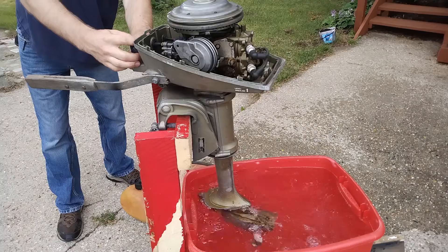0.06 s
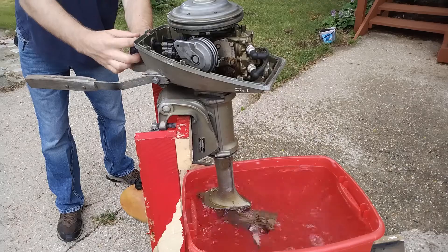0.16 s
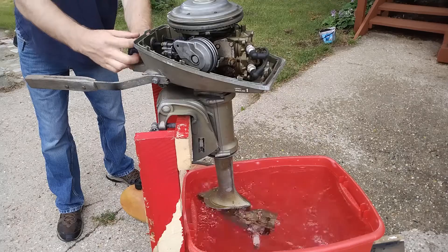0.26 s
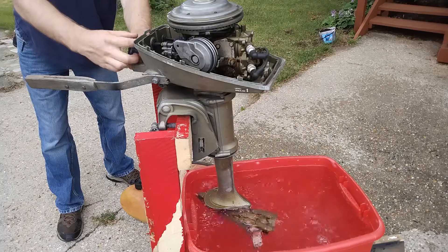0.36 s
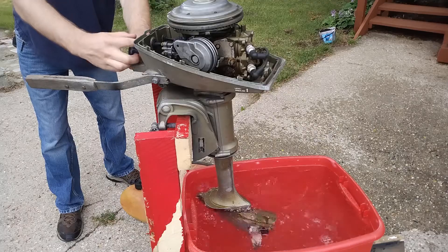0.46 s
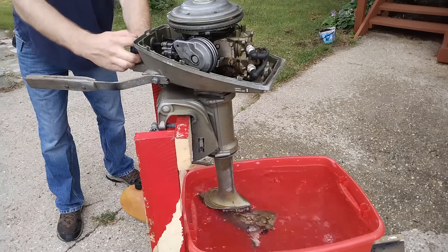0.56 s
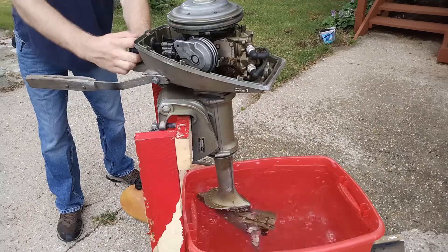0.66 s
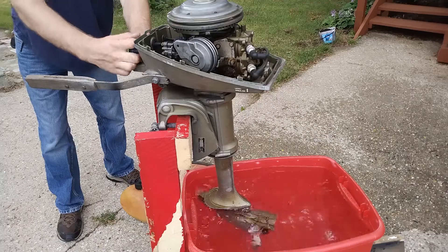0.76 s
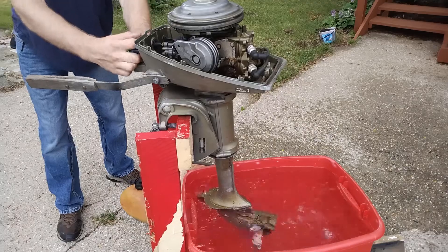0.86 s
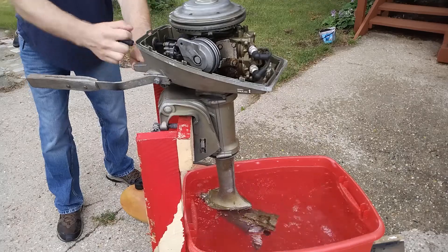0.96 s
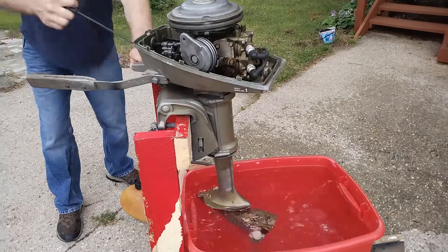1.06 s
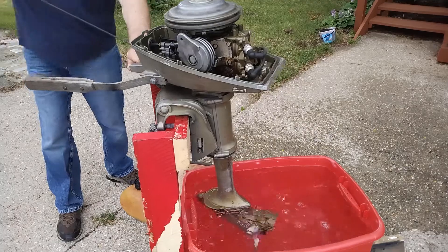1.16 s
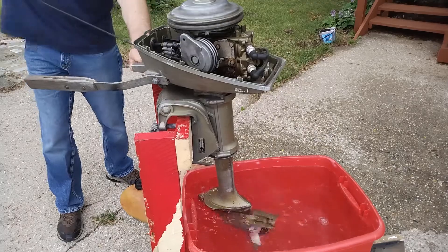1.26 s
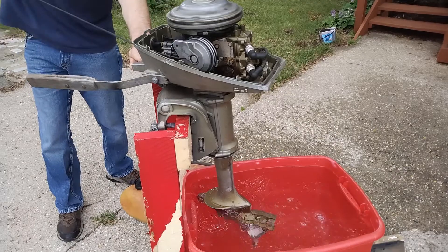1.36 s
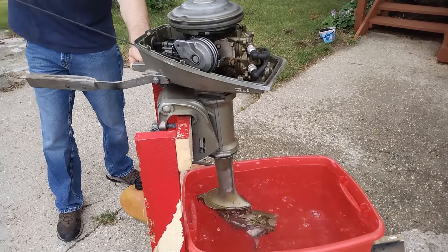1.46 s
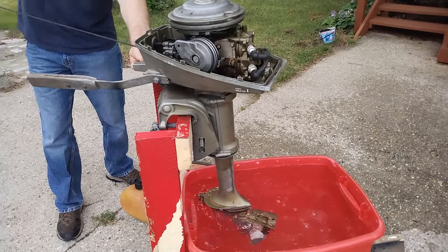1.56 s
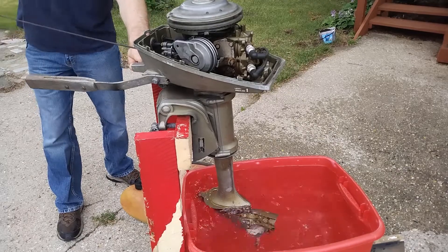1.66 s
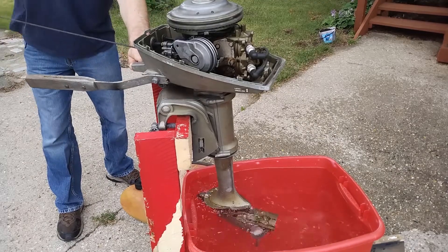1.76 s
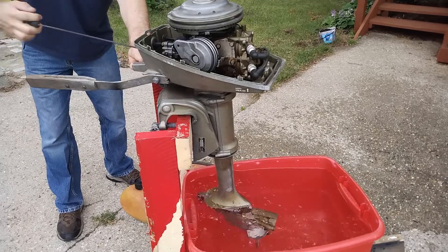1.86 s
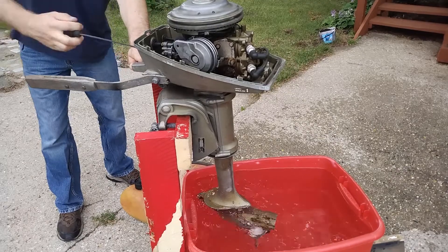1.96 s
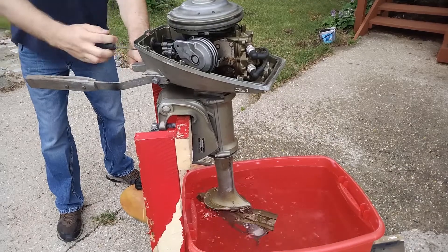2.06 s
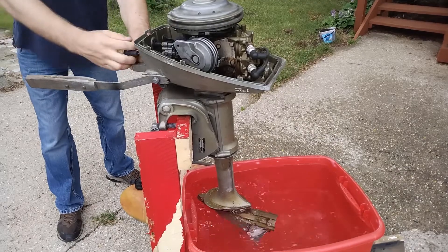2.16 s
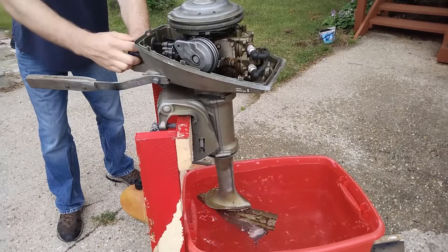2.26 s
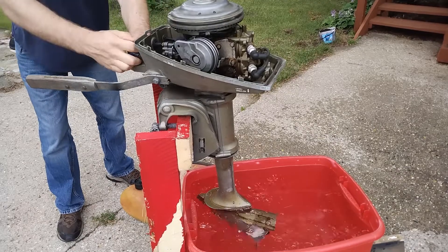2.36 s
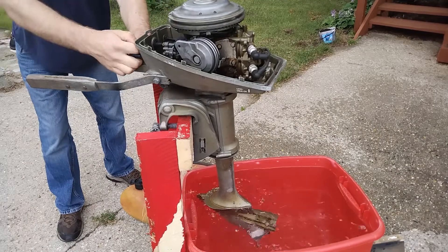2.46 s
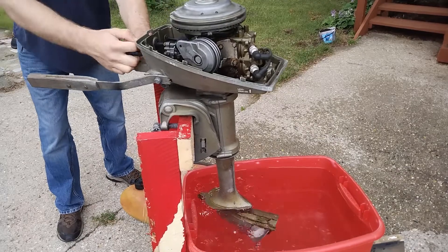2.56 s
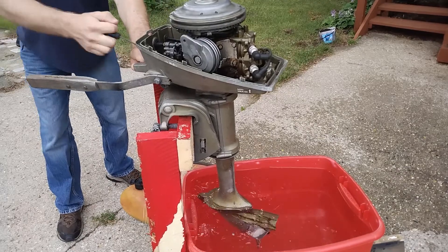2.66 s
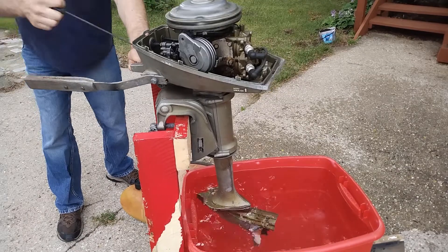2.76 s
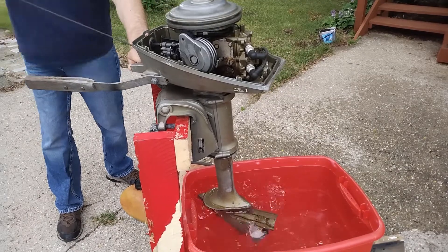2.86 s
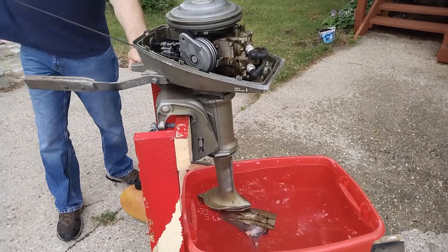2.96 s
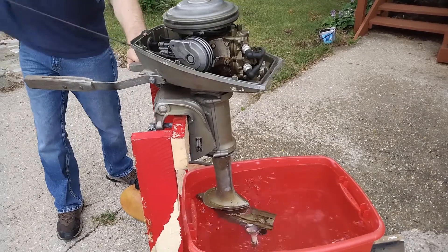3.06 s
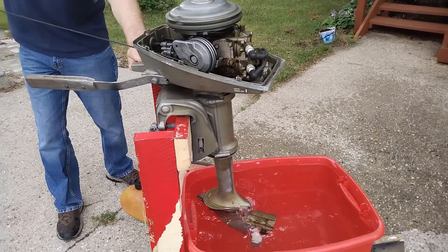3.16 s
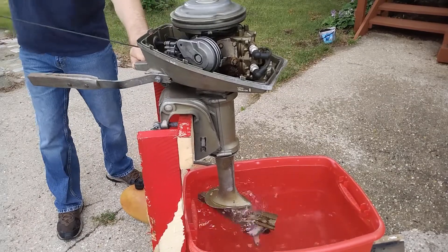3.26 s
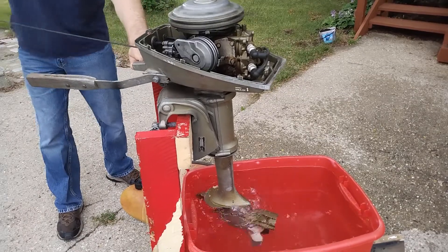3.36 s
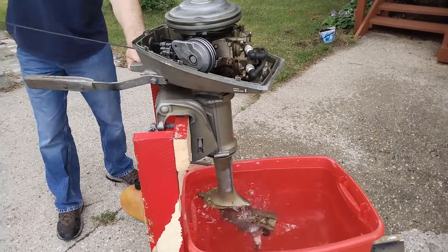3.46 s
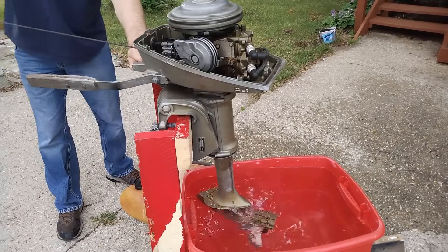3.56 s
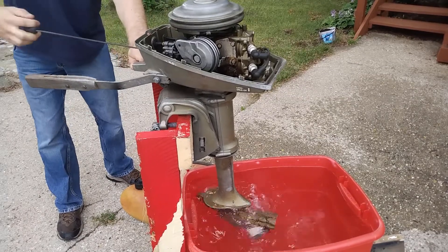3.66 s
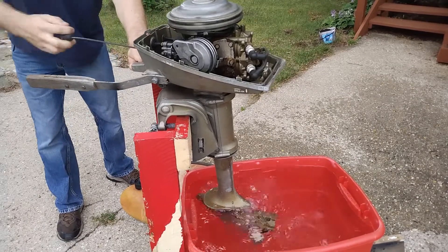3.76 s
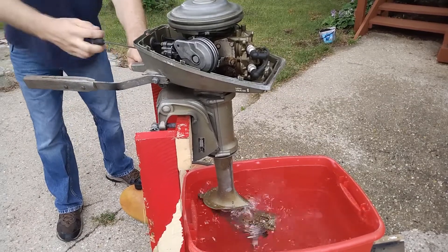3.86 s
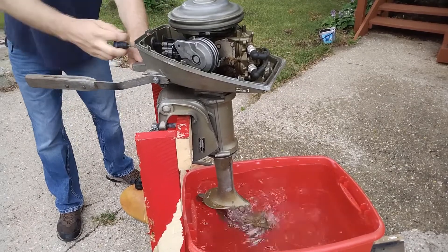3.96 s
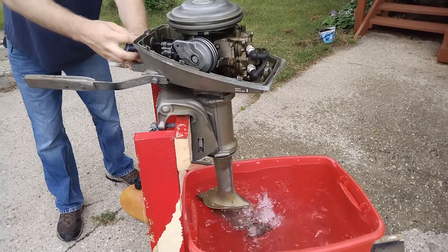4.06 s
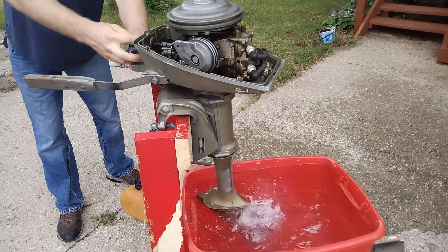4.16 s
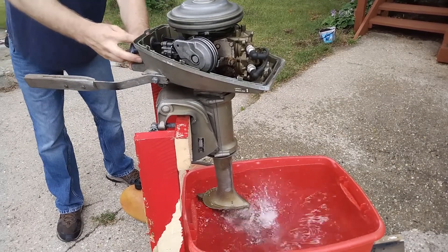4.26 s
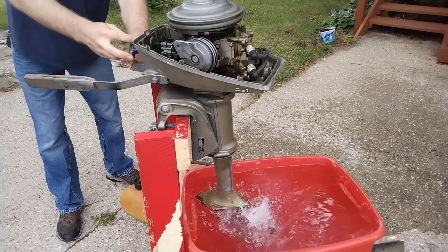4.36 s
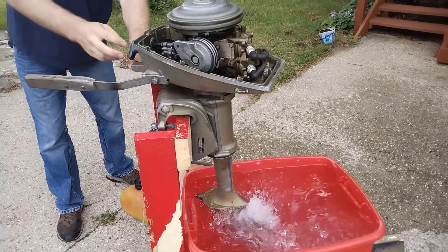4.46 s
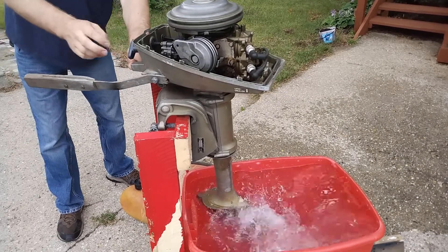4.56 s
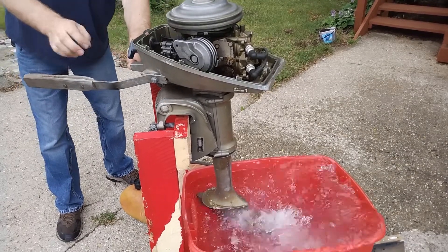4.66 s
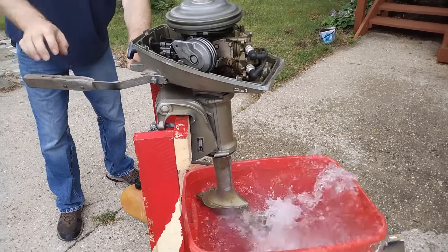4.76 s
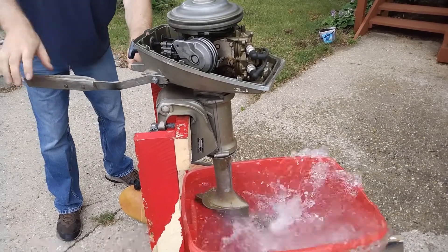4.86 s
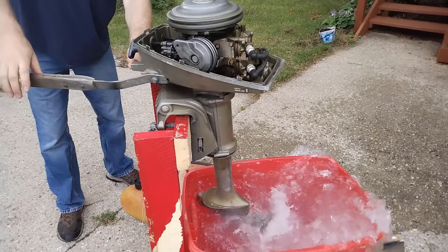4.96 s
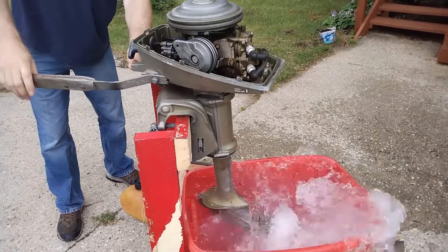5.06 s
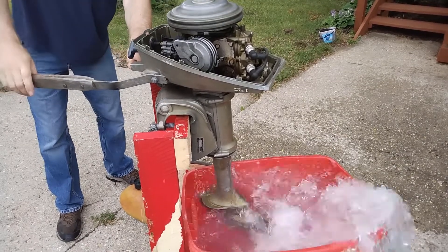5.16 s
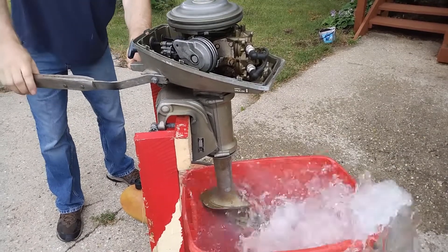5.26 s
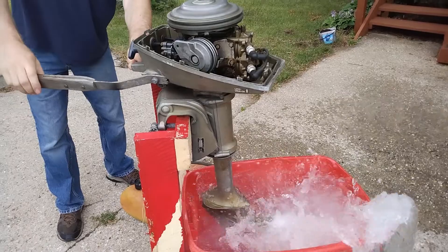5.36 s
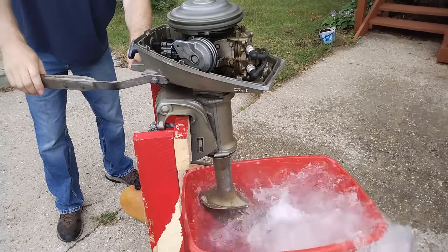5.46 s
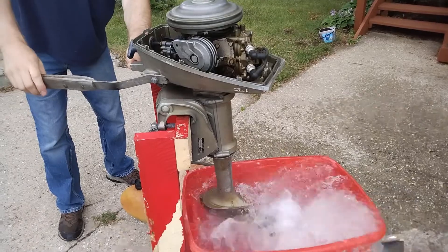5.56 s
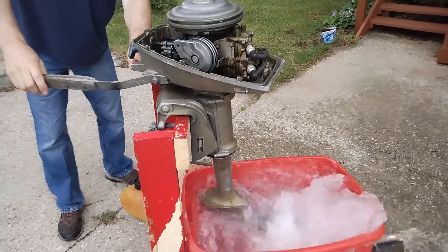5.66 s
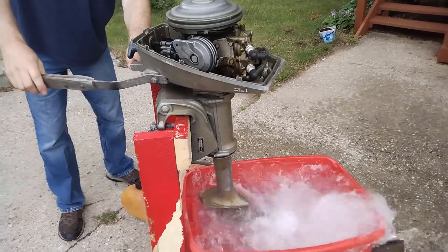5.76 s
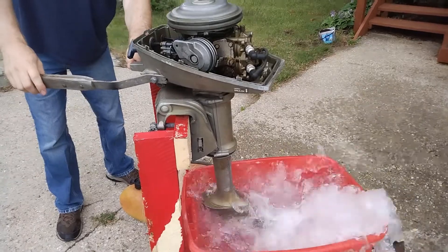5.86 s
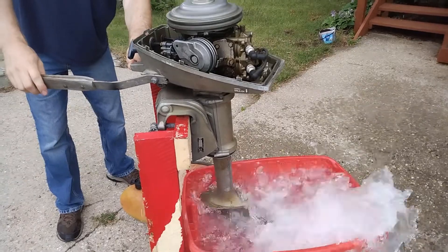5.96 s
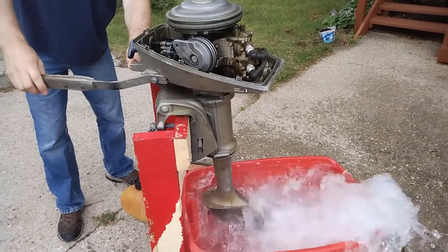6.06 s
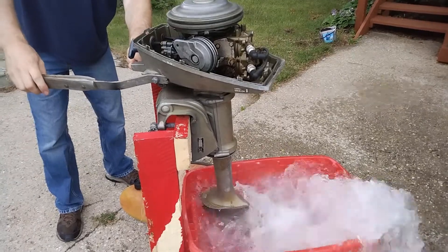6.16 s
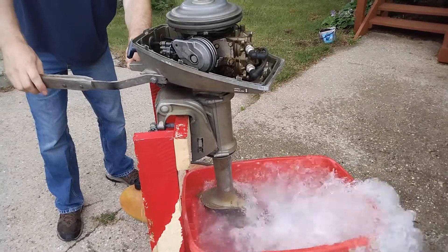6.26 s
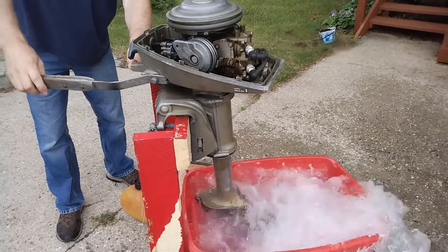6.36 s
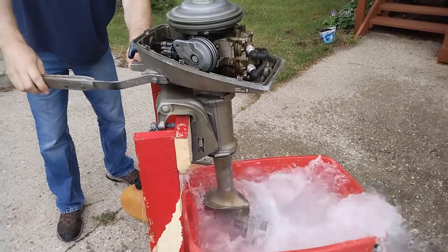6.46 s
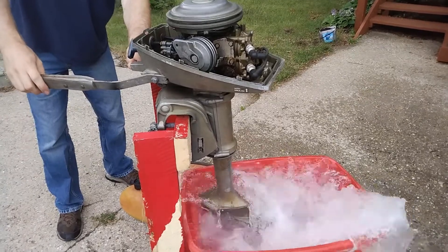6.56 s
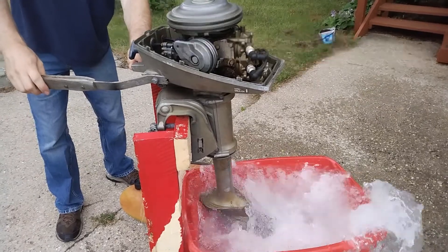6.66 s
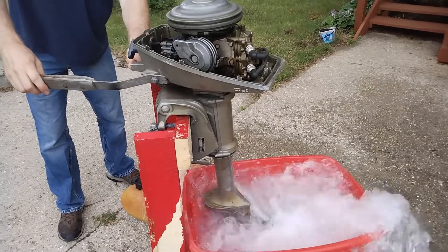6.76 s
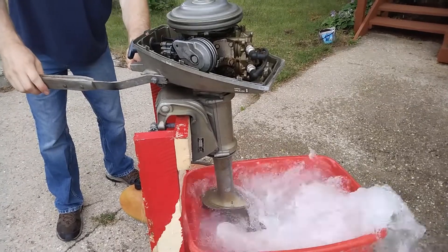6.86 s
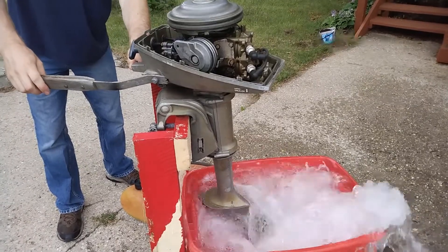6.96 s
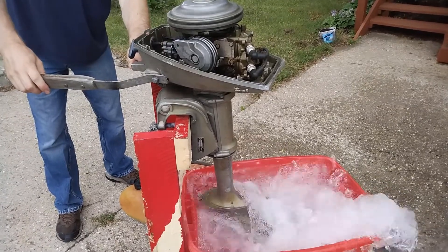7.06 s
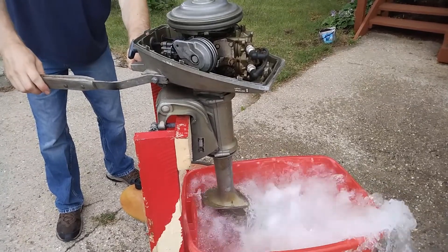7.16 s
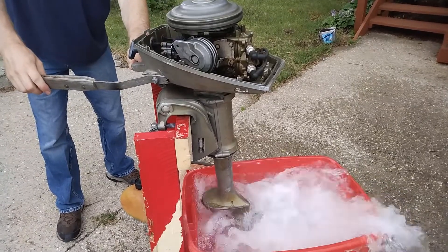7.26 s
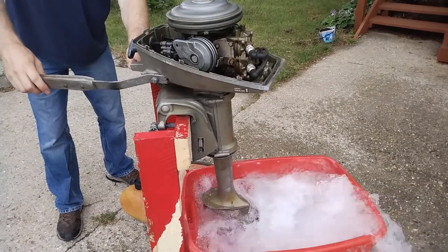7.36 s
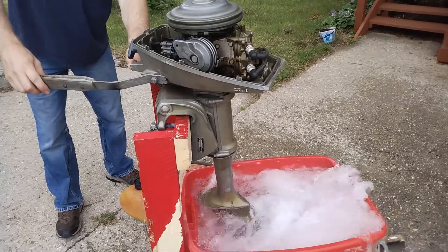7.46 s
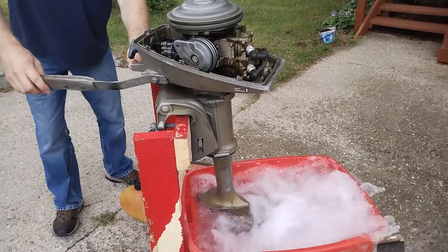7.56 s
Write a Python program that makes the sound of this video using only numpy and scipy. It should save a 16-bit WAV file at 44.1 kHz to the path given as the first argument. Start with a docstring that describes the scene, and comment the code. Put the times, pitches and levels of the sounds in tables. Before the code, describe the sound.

Outdoors, a starter cord rips twice with clattering gear teeth; the small boat motor sputters, fires up and climbs to a throbbing, splashing drone

```python
"""Starting a small outboard engine

A small two-stroke outboard is clamped over a tub of water outdoors, with faint birds and a breeze.
The starter rope is pulled twice: gear teeth rattle as random clicks ringing in the housing.
After the second pull the engine chugs, catches and revs up. Each firing rings decaying sine waves for
the exhaust; filtered noise and clicks throb with it as roar and spray, and large drops slap the tub."""
import sys
import numpy as np
from scipy import signal
from scipy.fft import rfft, irfft, next_fast_len
from scipy.io import wavfile

SR = 44100
rng = np.random.default_rng(int(sys.argv[2]) if len(sys.argv) > 2 else 0)


def to_wav(sig):
    """Store sig (one row per channel, or 1-D mono) as 16-bit WAV at the path in sys.argv[1].

    Samples outside -1..1 are clipped; the rate is SR.
    """
    pcm = np.clip(np.atleast_2d(sig), -1, 1) * 32767
    pcm = np.round(pcm).astype(np.int16)
    wavfile.write(sys.argv[1], SR, pcm.T)  # frames by channels


N = 336042


def amp(db):
    """Turn a level in dB into a gain."""
    return 10 ** (np.asarray(db) / 20)


def rms_one(x):
    """Scale to an average strength (rms) of 1."""
    return x / np.sqrt(np.mean(x ** 2) + 1e-20)


def noise():
    """White noise for the whole scene."""
    return rng.standard_normal(N)


def high_pass(x, hz):
    """Remove what lies below hz."""
    return signal.sosfilt(signal.butter(2, hz, "high", fs=SR, output="sos"), x)


def low_pass(x, hz):
    """Soften what lies above hz."""
    return signal.sosfilt(signal.butter(2, hz, fs=SR, output="sos"), x)


def in_time(rows, outside=None):
    """Join the points of a time table by straight lines, one curve per column."""
    s, *columns = np.transpose(rows)
    return [np.interp(np.arange(N) / SR, s, c, outside, outside) for c in columns]


def at_hz(points, hz):
    """Read a spectrum table on a log pitch axis."""
    table_hz, level_db = np.array(points).T
    return np.interp(np.log(hz + 1), np.log(table_hz), level_db)


def drift(rate):
    """Slow random wander of rms 1; a higher rate wanders faster."""
    r = np.exp(-80 * np.pi * rate / SR)
    # computed at every 40th sample, after a run-in of 2000 steps
    steps = rng.standard_normal(N // 40 + 2002)
    slow = signal.lfilter([1], [1, -2 * r, r * r], steps)[2000:]
    return np.interp(np.arange(N) / 40, np.arange(len(slow)), rms_one(slow))


def filter_by(x, spectrum):
    """Apply a spectrum table as a filter."""
    return irfft(rfft(x) * amp(at_hz(spectrum, np.fft.rfftfreq(N, 1 / SR))), N)


def colour(x, spectrum):
    """Give noise the tone of a spectrum table, at rms 1."""
    return rms_one(filter_by(x, spectrum))


def resonate(x, hz, width):
    """Ring one resonance of a width in Hz, with gain 1 at its peak."""
    r = np.exp(-np.pi * width / SR)
    top = np.array([1, 0, -1]) * (1 - r * r) / 2
    return signal.lfilter(top, [1, -2 * r * np.cos(2 * np.pi * hz / SR), r * r], x + 1e-18)


def grains(per_s, spread_db):
    """Random clicks of uneven size and sign."""
    sizes = amp(spread_db * np.minimum(rng.exponential(1, N), 4)) * rng.choice([-1, 1], N)
    return sizes * (rng.random(N) < per_s / SR)


def puffs(events, t60_s, rise_s=0.000055):
    """Short noise bursts from rows of time and level; each rises, then dies away."""
    clicks = np.full(N, 1e-18)
    start_s, level_db = np.array(events).T
    clicks[(start_s * SR).astype(int)] = amp(level_db)
    dying = signal.lfilter([1], [1, -amp(-60 / (t60_s * SR))], clicks)
    r = np.exp(-1 / (rise_s * SR))
    return signal.lfilter([1 - r], [1, -r], dying) * noise()


def swell(full_s, end_s, db, rise, fall, sag=0.0, hold_s=0.0):
    """Level in dB: rises to full, sags after a hold, falls faster after the end (rates in dB per s)."""
    t = np.arange(N) / SR
    rising = rise * np.maximum(full_s - t, 0)
    sagging = sag * np.maximum(t - full_s - hold_s, 0)
    return db - rising - sagging - fall * np.maximum(t - end_s, 0)


# steady background tone: pitch_hz, level_db (relative)
YARD_SPECTRUM = [(88, -16), (1820, -17.5), (2960, -27), (13800, -36.5), (15800, -35)]
YARD_DB = -75


def yard():
    """The quiet outdoor background is steady coloured noise."""
    return amp(YARD_DB) * colour(noise(), YARD_SPECTRUM)


# stronger gusts: peak_s, level_db (before panning)
GUST_TABLE = [(0.28, -51.5), (0.62, -53.5)]
BREEZE_DB, GUST_DB_PER_S = -60.5, 148   # level of the rumble before panning; rise and fall of a gust


def breeze():
    """Wind makes a lumpy low rumble; the stronger it blows, the more it leans to the left."""
    gusts = [swell(s, s, db, GUST_DB_PER_S, GUST_DB_PER_S) for s, db in GUST_TABLE]
    level_db = np.max([np.full(N, BREEZE_DB)] + gusts, axis=0)
    lumps = rng.standard_normal((3, N)) * amp(2.0 * drift(23))
    lumps = signal.sosfilt(signal.butter(2, [60, 130], "band", fs=SR, output="sos"), lumps)
    pan_db = 0.63 * np.maximum(level_db + 63.0, 0) * [[1], [-1]]
    # one shared rumble, plus a little of each side's own
    return amp(level_db + pan_db) * rms_one(lumps[0] + .1 * lumps[1:])


# distant chirps, around which pitch and level warble: start_s, length_s, first_hz, last_hz, level_db
CHIRPS = [(0.134, 0.088, 3600, 3840, -74), (0.249, 0.1, 3720, 3500, -76), (0.518, 0.098, 3880, 3400, -73),
          (0.544, 0.058, 3600, 5030, -68), (0.687, .06, 3700, 3440, -78), (0.745, 0.071, 4350, 3800, -74),
          (2.218, 0.04, 4250, 4750, -69), (2.297, 0.05, 4120, 4700, -71.5)]


def birds():
    """Chirps are warbling near-sine tones, blurred by distance and by echoes off the houses."""
    out = np.zeros(N)
    for s, length, first, last, db in CHIRPS:
        i, t = int(s * SR), np.arange(int(length * SR)) / SR
        span = slice(i, i + len(t))
        hz = first + (last - first) * t / length + 110 * drift(63)[span]
        tone = np.sin(2 * np.pi * np.cumsum(hz) / SR)
        out[span] += amp(db + 6.8 * drift(120)[span]) * np.sin(np.pi * t / length) * tone
    lags_s = rng.uniform(.015, .15, size=12)
    out = out + sum(amp(-10 - 60 * lag) * np.roll(out, int(lag * SR)) for lag in lags_s)
    # farther calls blur together
    return out + amp(-82.5 + 4 * drift(8)) * rms_one(resonate(noise(), 4100, 990))


# resonances of the starter housing: pitch_hz, width_hz, level_db (relative)
HOUSING_MODES = [(1127, 770, 3), (1400, 2400, 1.5), (1780, 360, 8), (2910, 1320, -2), (3230, 210, 10.5),
                 (4740, 92, -2), (5130, 340, -2)]


def housing(x, tilt_db=0.0):
    """The starter housing rings broadly; which resonance is struck, and which side of it, keeps shifting."""
    out = 0
    for k, (hz, width, db) in enumerate(HOUSING_MODES):
        for side in (-1, 1):
            struck = x * amp(db - 11 + tilt_db * np.log2(hz / 2000) + 3.0 * drift(30))
            out = out + (-1) ** k * resonate(struck, hz * (1 + .025 * side), .6 * width)
    return out


# pawl and handle knocks: start_s, level_db (relative), brightness_db (snap against the knock)
KNOCK_TABLE = [(0.9845, -51, -21), (1.1034, -17, 2), (1.4534, -12, -5), (1.661, -23, -7.5),
               (1.699, -33, -10), (1.744, -22, -12), (1.948, -28, -22), (2.092, -22.5, -34),
               (2.7739, -33, -9), (2.7805, -16, 6.5), (3.1285, -12.5, -5.5)]
# the first tug jolts the stand: start_s, level_db (relative)
STAND_JOLT = [(1.1, -24)]


def knocks():
    """A knock cracks into the housing with a bright snap; the jolted stand thuds low."""
    snap = puffs([(s, db + bright) for s, db, bright in KNOCK_TABLE], t60_s=.03, rise_s=.001)
    crack = puffs([row[:2] for row in KNOCK_TABLE], t60_s=0.018, rise_s=0.0002)
    thud = amp(24.5) * resonate(puffs(STAND_JOLT, t60_s=0.043), 83, 80)
    return amp(12) * housing(crack) + high_pass(snap, 5000) + thud


# rope pulls: grab_s (pawl grabs), full_s (full speed), end_s (rope ends), level_db, slowing_db_per_s
ROPE_PULLS = [(1.1, 1.231, 1.428, -20.5, 79.5), (2.785, 2.906, 3.105, -22, 34)]
PULL_RISE_DB_PER_S, PULL_HOLD_S, PULL_STOP_DB_PER_S = 306.5, 0.084, 598
GRAB_DB, GRAB_FALL_DB_PER_S = -31.5, 545.5
CLACK_AFTER_S, CLACK_RATTLE_DB, CLACK_FALL_DB_PER_S = 0.023, -25.5, 457   # pawl lets go after rope end
# rope running back: full_s (under way), end_s (home), level_db, slowing_db_per_s
ROPE_REWINDS = [(1.593, 2.191, -46, 7.5), (3.246, 4.192, -45.5, 5)]
REWIND_RISE_DB_PER_S, REWIND_STOP_DB_PER_S = 202, 238
# wheezes of air while the flywheel coasts: peak_s, level_db (of the hiss)
AIR_WHEEZES = [(1.721, -35), (1.905, -41.5), (3.434, -39.5), (3.84, -44.5)]
WHEEZE_RISE_DB_PER_S, WHEEZE_FALL_DB_PER_S, WHEEZE_RATTLE_DB = 310, 473, -3
# tone of rope and air: pitch_hz, level_db (relative)
HISS_SPECTRUM = [(2350, -4.5), (4400, -1.5), (15800, -14.5)]
PULL_HISS_DB, REWIND_HISS_DB = -1, -8   # hiss relative to the rattle
RATCHET_PER_S, RATCHET_DB = 260, 2.0    # loose clicks while the rope runs back
COLOUR_CLIMB_DB_PER_S = 28.5            # per octave: a pull starts dull and brightens as the gear spins up


def starter():
    """Gear teeth rattle in the housing; rope and pumped air hiss."""
    t = np.arange(N) / SR
    pulls = [swell(full, end, db, PULL_RISE_DB_PER_S, PULL_STOP_DB_PER_S, sag, PULL_HOLD_S)
             for _, full, end, db, sag in ROPE_PULLS]
    grabs = [swell(grab, grab, GRAB_DB, 5000, GRAB_FALL_DB_PER_S) for grab, *_ in ROPE_PULLS]
    clack_s = [end + CLACK_AFTER_S for _, _, end, *_ in ROPE_PULLS]
    clacks = [swell(s, s, CLACK_RATTLE_DB, 3700, CLACK_FALL_DB_PER_S) for s in clack_s]
    rewinds = [swell(s, end, db, REWIND_RISE_DB_PER_S, REWIND_STOP_DB_PER_S, sag)
               for s, end, db, sag in ROPE_REWINDS]
    wheezes = [swell(s, s, db, WHEEZE_RISE_DB_PER_S, WHEEZE_FALL_DB_PER_S) for s, db in AIR_WHEEZES]

    pull = amp(pulls + grabs + clacks).sum(axis=0) * (t > ROPE_PULLS[0][0] - .01)
    rewind, wheeze = amp(rewinds).sum(axis=0), amp(wheezes).sum(axis=0)
    gear = pull + rewind + amp(WHEEZE_RATTLE_DB) * wheeze
    air = amp(PULL_HISS_DB) * pull + amp(REWIND_HISS_DB) * rewind + wheeze

    teeth = rms_one(grains(1300 * amp(3.5 * drift(40)), spread_db=3.5)) + .6 * noise()
    hiss = high_pass(colour(noise() * amp(3.8 * drift(53)) + 4.0 * teeth, HISS_SPECTRUM), 3800)
    loose = low_pass(grains(RATCHET_PER_S, spread_db=2.6), 4500)
    ratchet = amp(RATCHET_DB) * rewind * rms_one(housing(loose))
    climb = sum(COLOUR_CLIMB_DB_PER_S * (t - full - .08) * (t > grab) * (t < end)
                for grab, full, end, *_ in ROPE_PULLS)
    rattle = gear * rms_one(housing(teeth, climb))
    # the block's growl weakens a little less than the rattle does
    growl = amp(-12.0) * gear ** 0.94 * rms_one(resonate(teeth, 530, 360))
    # hard-driven teeth fill in between the rings
    rasp = amp(-1.5) * pull * rms_one(resonate(teeth, 2200, 3000))
    return rasp + growl + rattle + ratchet + air * rms_one(hiss)


# ring of the released pawl: pitch_hz, level_db
PAWL_MODES = [(5200, -18.5), (7050, -25.5), (8790, -23.5), (11580, -43)]
PAWL_T60_S = 0.044   # time to die by 60 dB


def pawl():
    """The released pawl rings thinly, as a few dying sine tones."""
    out, t = np.zeros(N), np.arange(SR // 5) / SR
    ring = sum(amp(db - 60 * t / PAWL_T60_S) * np.sin(2 * np.pi * hz * t) for hz, db in PAWL_MODES)
    for _, _, end, *_ in ROPE_PULLS:
        i = int((end + CLACK_AFTER_S) * SR)
        out[i:i + len(t)] += ring
    return out


# slow strokes before the engine catches: start_s, level_db (relative), bark_db (against that level)
CHUG_TABLE = [(1.512, -15.5, -25), (1.581, -14.5, -31), (3.176, -11.5, -37), (3.247, -9.5, -7.5),
              (3.293, -7, -29), (3.365, -6.5, -15), (3.413, -4, -16), (3.537, -4.5, -33), (3.619, -6, -12),
              (3.662, -6, -18), (3.718, -9, -8), (3.768, -2.5, -12), (3.817, -8.5, -2.5), (3.852, -5, -29),
              (3.9, -11, -1.5), (3.934, -4, -20), (3.975, -1, -8), (4.032, -4, -1.5), (4.067, 1, -32),
              (4.121, -5.5, -5.5), (4.145, -1, -9.5)]
# resonances of the leg: pitch_hz, width_hz, level_db (relative)
LEG_MODES = [(247, 115, -18.5), (378, 105, -12.5), (584, 26, -13.5), (780, 162, 0), (1185, 27, -10),
             (2220, 330, -16)]


def chugs():
    """A swelling puff of gas bubbles through the leg's resonances; the water dulls the top."""
    dull = puffs([row[:2] for row in CHUG_TABLE], t60_s=0.16, rise_s=0.008)
    sharp = puffs([(s, db + bark) for s, db, bark in CHUG_TABLE], t60_s=0.055, rise_s=0.003)
    out = sum(amp(db + 11.5) * resonate(dull if hz < 700 else sharp, hz, width)
              for hz, width, db in LEG_MODES)
    return low_pass(out, 2500)


# tone of the spray: pitch_hz, level_db (relative)
SPRAY_SPECTRUM = [(1200, 9.5), (2080, 0.5), (3130, 0.5), (4980, -9), (15800, -7.5)]


def spray(gate):
    """Drops crackle in clumps on a smooth hiss; both throb with the firings."""
    drops = rms_one(grains(900 * gate ** 2 * amp(4.0 * drift(20)), spread_db=6))
    hiss = noise() * amp(1.2 * drift(30)) * gate ** .5
    wet = colour(amp(-5.0) * resonate(drops, 3500, 6000) + rms_one(hiss), SPRAY_SPECTRUM)
    return rms_one(high_pass(wet, 1400))


def bursts(at, modes, uneven_db, rise_s):
    """Each firing rings every mode, whose pitch wanders as the froth shifts; rms 1 while running."""
    out, t = np.zeros(N + 2048), np.arange(2048) / SR
    for hz, t60, level_db, wander in modes:
        pitch = hz * np.exp(wander * drift(3.17)[at])
        uneven = drift(28.0)[at] + rng.standard_normal(len(at))
        gain = amp(level_db + uneven_db * uneven)
        for i, f, g, rise in zip(at, pitch, gain, rise_s + 0 * pitch):
            # a slow rise also lengthens the ring
            shape = amp(-60 * t / (t60 + 6 * rise)) * (1 - np.exp(-t / rise))
            out[i:i + 2048] -= g * shape * np.sin(2 * np.pi * f * t)
    return out[:N] / np.std(out[at[0]:N])


def late(at, spread_s):
    """Delay each firing by a small random time."""
    delay = (spread_s * SR * np.abs(rng.standard_normal(len(at)))).astype(int)
    return np.clip(at + delay, 0, N - 1)


# level of the block hum: time_s, level_db
HUM_LEVEL = [(4.15, -47), (4.45, -39.5), (5.5, -31), (6.3, -29.5), (6.85, -30), (7.08, -22.5), (7.24, -37),
             (7.33, -26.5), (7.62, -32)]


def block_hum(cycles):
    """The engine block hums as a sine at the firing rate, its phase and level wandering."""
    level = amp(in_time(HUM_LEVEL, -120)[0]) * amp(3.0 * drift(10))
    return np.sqrt(2) * level * np.sin(2 * np.pi * cycles + .5 * drift(8))


def froth_roar(at, gate, roar_db):
    """Noise throbbing with the firings roars through the froth in a low and a high band."""
    fade_in = np.clip((np.arange(N) - at[0]) / (.15 * SR), 0, 1)
    roar = noise() * gate * amp(1.3 * drift(37.0)) * fade_in
    low = amp(roar_db - 12.5) * rms_one(resonate(roar, 270, 280))
    high = resonate(roar, 592, 520) - amp(-4.0) * resonate(roar, 1100, 600)
    return low, amp(roar_db - 14.0) * rms_one(high)


GULP_HZ, GULP_OCTAVES, GULP_CYCLES, GULP_DB = 850, 2.1, 20, -15   # lowest start, range, ring, level


def gulps(at):
    """Each firing tears off a bubble of its own size, ringing with a rising pitch; rms 1 while running."""
    out, t = np.zeros(N + 1024), np.arange(1024) / SR
    for i, (smallness, luck, wait) in zip(at, rng.random((len(at), 3))):
        hz = GULP_HZ * 2 ** (GULP_OCTAVES * smallness)
        i = i + int(wait * .008 * SR)
        if i < N:
            level = amp(12.0 * luck - 2.0 * smallness - 60 * t * hz / GULP_CYCLES)
            tone = np.sin(2 * np.pi * hz * t * (1 + 7.4 * t))
            out[i:i + 1024] += level * (1 - np.exp(-t / 0.0024)) * tone
    return out[:N] / np.std(out[at[0]:N])


# the open outlet's own note: pitch_hz, ring_s, level_db (relative), wander_share (of the pitch)
OUTLET_NOTE = [(690, .026, 0, .02)]
# level of that note: time_s, level_db
HONK_LEVEL = [(4.15, -38.5), (4.61, -22), (5.1, -40.5), (5.145, -18), (5.19, -21), (5.23, -32), (5.76, -33),
              (5.81, -20.5), (5.92, -26.5), (6.03, -18.5), (6.12, -36), (6.2, -27), (7.62, -23.5)]


def honk(at):
    """The open exhaust outlet rings its own note at each firing."""
    return amp(in_time(HONK_LEVEL, -120)[0]) * bursts(at, OUTLET_NOTE, uneven_db=1.5, rise_s=0.0004)


# piston ticks: pitch_hz, ring_s, level_db (relative), wander_share (of the pitch)
TICK_MODES = [(2550, .004, -2, .04), (2950, .005, 0, .03), (3250, .008, -1, .015)]
# level of the ticks: time_s, level_db (before the top is dulled)
TICK_CURVE = [(4.15, -42), (5.06, -37), (5.17, -46), (5.4, -36), (5.85, -52), (6.4, -42), (6.8, -31),
              (7.08, -27), (7.25, -39), (7.42, -30), (7.62, -30)]


def piston_ticks(at, cycles):
    """Ticks fall between bursts, dull above their top mode; one cylinder ticks harder than the other."""
    uneven_pair = amp(2.0 * np.cos(np.pi * np.floor(cycles)))
    tick = bursts(late(at, .00015), TICK_MODES, uneven_db=1.0, rise_s=.0002) * uneven_pair
    tick = np.roll(tick, 200)   # in samples
    tick = signal.sosfilt(signal.cheby2(6, 25, 3600, fs=SR, output="sos"), tick)
    return amp(in_time(TICK_CURVE, -120)[0]) * tick


# engine speed: time_s, firings_per_s
FIRING_RATE = [(4.15, 43.6), (4.22, 47.5), (4.33, 53.3), (4.49, 60.9), (4.58, 66.5), (4.7, 69.8),
               (5.11, 78.1), (5.4, 78.9), (5.49, 81.4), (5.85, 85.2), (6.26, 85.4), (6.91, 90.1),
               (7.22, 93.9), (7.45, 92.6), (7.62, 92.5)]
# froth thrown over the outlet, as a spray level: time_s, level_db (before SPRAY_OVER_FROTH_DB)
FROTH_LEVEL = [(3.7, -65), (4.05, -47.5), (4.26, -41.5), (4.68, -38.5), (5.07, -28), (5.17, -37.5),
               (5.25, -34.5), (5.77, -30), (5.85, -34.5), (6.8, -31), (7.12, -27), (7.32, -36),
               (7.4, -29.5), (7.62, -30)]
# exhaust: time_s, boom_db, bark_db (relative to the boom: high when the outlet lies open)
EXHAUST_LEVEL = [(4.16, -12, -8.5), (4.33, -16.5, -2.5), (4.46, -17, -8.5), (4.63, -16.5, -2.5),
                 (4.72, -17, -4), (5.08, -21.5, -9), (5.17, -23.5, -1.5), (5.24, -19, -9.5),
                 (5.4, -18.5, -7), (5.84, -23.5, 0), (5.97, -21, -4.5), (6.15, -19.5, -8.5),
                 (6.38, -20, -5), (6.46, -20.5, -4), (7.1, -22, -4.5), (7.39, -19.5, -7),
                 (7.62, -21, -10.5)]
# next three, rung by gas pocket, leg and burst front:
# pitch_hz, ring_s, level_db (relative), wander_share (of the pitch)
BOOM_MODES = [(225, .035, -6, .09), (270, .05, 0, .07), (340, .035, -3, .07)]
BARK_MODES = [(590, .03, -2, .06), (950, .025, -3, .06), (1400, .012, -8, .08)]
POP_MODES = [(560, 0.003, 0, 0.1)]
POP_DB, POP_SHARE = 4, 1   # pop against the bark; dB gained per dB of opening
# bursts that break clear of the froth: time_s, extra_db
CLEAR_FIRINGS = [(4.344, 4), (5.408, 11)]
FULL_RATE, FULL_FROTH_DB, FROTH_DB_PER_OCTAVE = 112, -30.5, 5.5   # usual froth at a rate in firings per s
SPRAY_OVER_FROTH_DB = 5
ROAR_SHARE, OPEN_ROAR_SHARE = .7, -.6   # roar dB per dB of froth above the usual, and per dB of opening


def engine():
    """Hum, exhaust bursts, ticks, froth roar and spray are all locked to the firings."""
    rate = in_time(FIRING_RATE, 0)[0]
    octaves = np.log2(np.maximum(rate, FIRING_RATE[0][1]) / FULL_RATE)
    froth_db = in_time(FROTH_LEVEL, -120)[0]
    boom_db, open_db = in_time(EXHAUST_LEVEL)
    usual_db = FULL_FROTH_DB + FROTH_DB_PER_OCTAVE * octaves
    extra_db = (froth_db - usual_db) * (rate > 0)
    roar_db = ROAR_SHARE * extra_db + OPEN_ROAR_SHARE * open_db

    # count firing cycles; a firing comes at each whole number
    cycles = np.cumsum(rate) / SR + .4
    at = np.flatnonzero(np.diff(np.floor(cycles)))
    gate = amp(-13.0 * (cycles % 1))   # froth is loudest after each burst and fades until the next
    # an open outlet fires evenly, a drowned one raggedly
    ragged = np.clip(1 + .08 * (extra_db - open_db), .35, 1.6)[at]

    low, high = froth_roar(at, gate, roar_db)
    boom_rise_s = .0006 * 2 ** (-1.9 * octaves[at])   # slow firings swell
    boom = bursts(late(at, .0001), BOOM_MODES, 1.4 * ragged, boom_rise_s) + low
    boom = high_pass(boom, 150)   # the small pocket radiates no deep bass
    bark_rise_s = .0001 * 2 ** (-2.5 * octaves[at])
    bark = amp(-1.5) * bursts(late(at, .00008), BARK_MODES, 1.7 * ragged, bark_rise_s) + high
    pop = bursts(at, POP_MODES, uneven_db=2.9 * ragged, rise_s=.0001)
    pop = amp(POP_DB + POP_SHARE * open_db + 3.5 * octaves) * pop
    hard_db = sum(db * (np.floor(cycles) == np.round(cycles[int(s * SR)])) for s, db in CLEAR_FIRINGS)
    bubbling = amp(GULP_DB + roar_db) * gulps(at)
    exhaust = amp(boom_db) * (boom + amp(open_db + hard_db) * (bark + pop) + bubbling) + honk(at)
    thrown = amp(froth_db + SPRAY_OVER_FROTH_DB) * spray(gate)
    return block_hum(cycles) + exhaust + piston_ticks(at, cycles) + thrown


# large drops on the tub wall: start_s, level_db (relative), pitch_hz
TUB_SLAPS = [(4.565, -12, 3220), (4.826, -11, 3670), (5.065, -17, 4500), (5.6185, -18, 6550),
             (6.23, -23, 11100)]


def slaps():
    """Large drops crack on the tub wall, each as a noise burst in its own band."""
    return sum(amp(12.0) * resonate(puffs([(s, db)], t60_s=0.0077), hz, 0.2 * hz)
               for s, db, hz in TUB_SLAPS)


# stereo width: pitch_hz, side_db (side relative to the middle)
SIDE_WIDTH = [(60, -51), (240, -24.5), (950, -13), (3770, -0.5)]


def ports(x):
    """Two ports hear the sound; their difference lies a quarter cycle off, its phase wandering with scatter."""
    whole = signal.hilbert(x, next_fast_len(N))[:N]
    side = np.real(whole * np.exp(1j * (np.pi / 2 + 1.6 * drift(150))))
    side = filter_by(side, SIDE_WIDTH)
    return np.array([x + side, x - side])


def scene():
    """Spread the sources through the ports and add the breeze, which has its own panning."""
    before = yard() + birds() + knocks() + starter() + pawl()
    return ports(before + chugs() + engine() + slaps()) + breeze()


START_S, CUTOFF_HZ = 0.081, 15800   # the sound fades in here; steep top cut


def record(dry):
    """Fade in, cut the deep bass, round off the peaks and cut the top steeply."""
    opened = np.clip((np.arange(N) / SR - START_S) / .01, 0, 1)
    dry = high_pass(dry * opened, 35)
    rounded = .85 * np.tanh(dry / .85)
    return signal.sosfilt(signal.ellip(12, .5, 70, CUTOFF_HZ, fs=SR, output="sos"), rounded)


dry = scene()
out = record(dry)
to_wav(out)
```